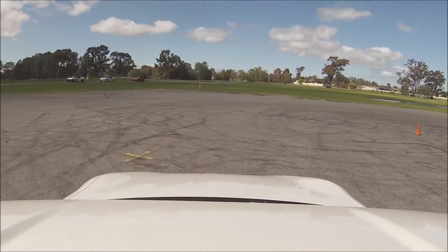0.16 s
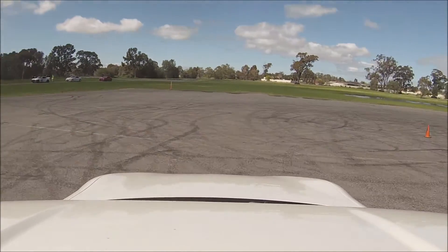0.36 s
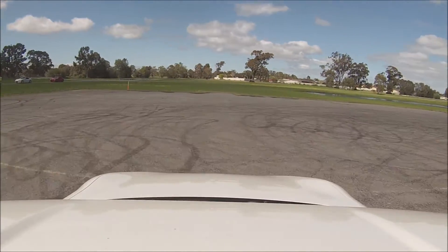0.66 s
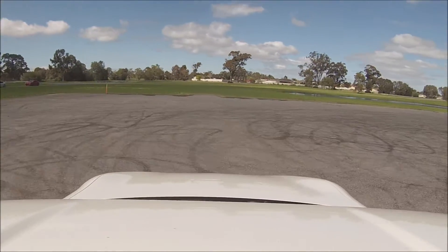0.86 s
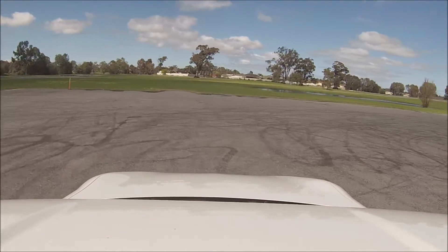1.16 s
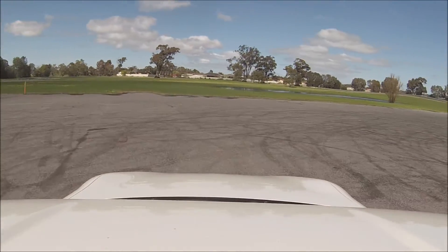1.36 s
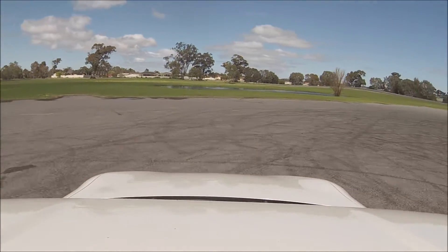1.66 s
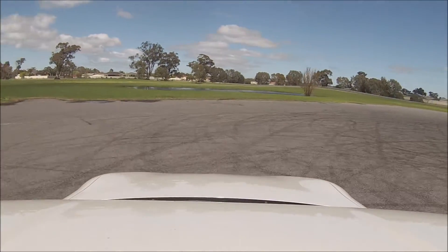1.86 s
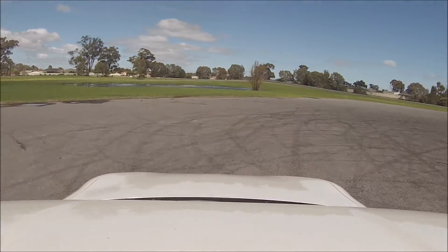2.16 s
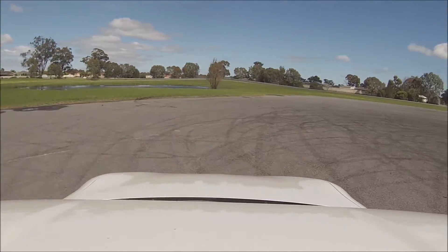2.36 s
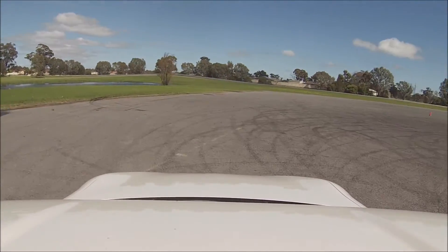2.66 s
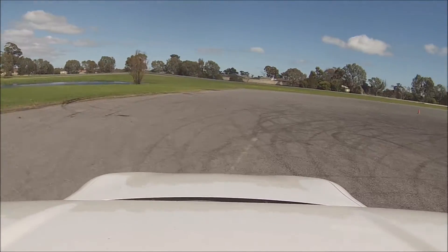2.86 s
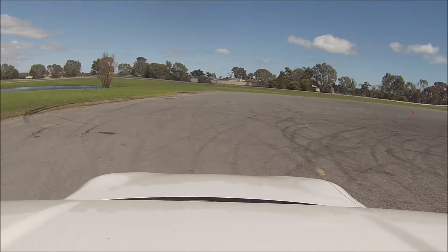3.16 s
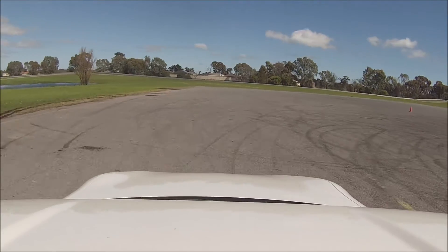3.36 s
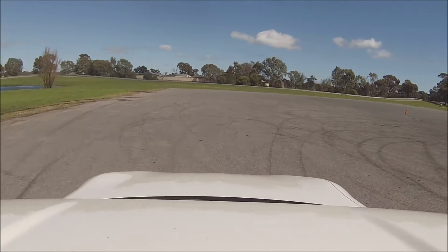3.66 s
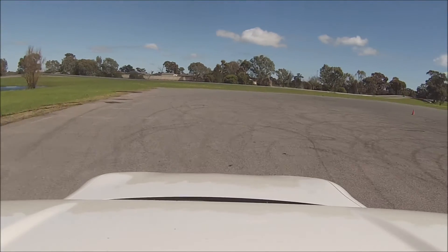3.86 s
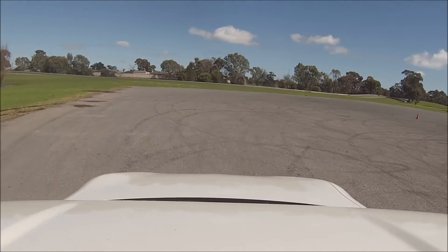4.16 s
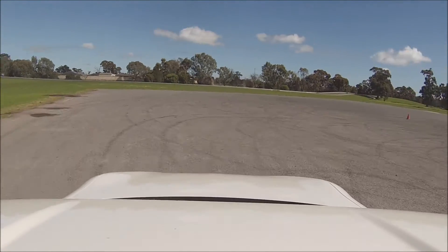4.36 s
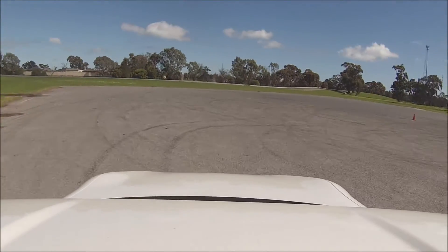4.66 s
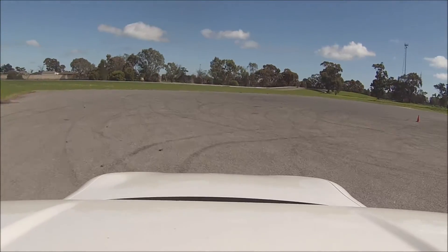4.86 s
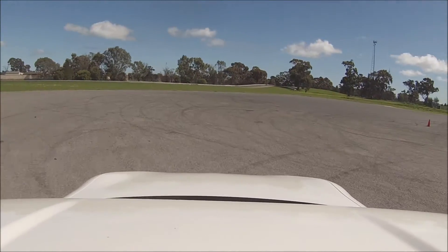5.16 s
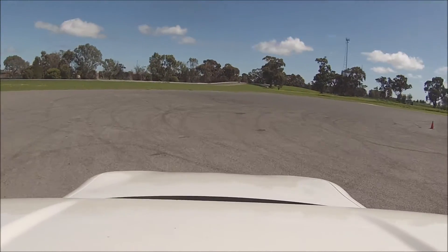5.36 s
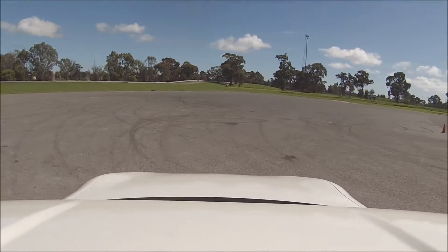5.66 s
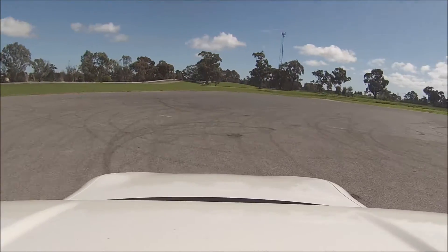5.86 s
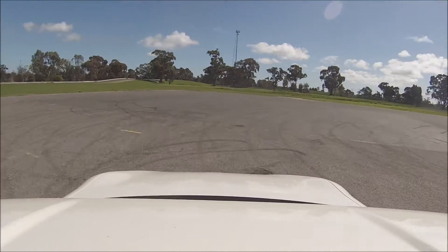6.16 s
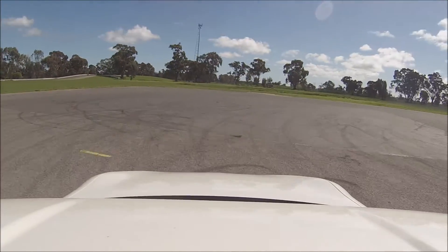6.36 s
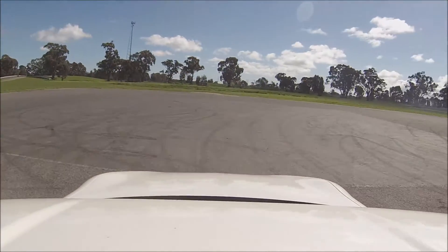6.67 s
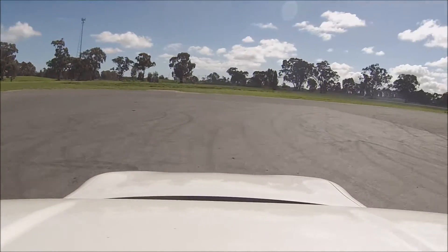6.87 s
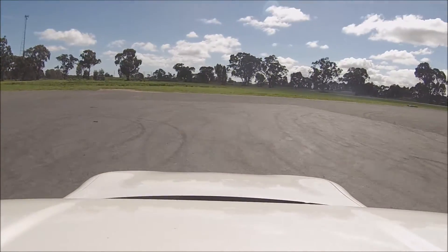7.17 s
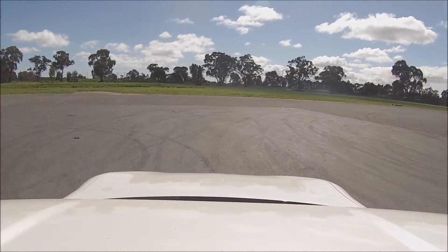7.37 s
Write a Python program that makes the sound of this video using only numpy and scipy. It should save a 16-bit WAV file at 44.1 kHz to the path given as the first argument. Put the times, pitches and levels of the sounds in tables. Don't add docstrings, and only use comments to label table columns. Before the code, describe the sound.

Continuous mono sound from an encased microphone on the roof of a car sliding around open tarmac, already under way at 0 s. A low, clean engine hum moves within a narrow range, sagging near 1 s, swelling around 1.7 s, sinking by 2.9 s, then surging near 3.5, 4.2, 5.2 and 6.1 s, the last climb highest and barkiest. Beneath it, rough road shakes the body in a fluttering low boom. Coarse, ringing tyre scrub with airy fizz dominates until about 1.8 s, then eases but persists, fading after 6 s. Hollow tyre howl thickens at 2.1-3.8, 4.4-5 and from 6.6 s. Grit ticks scatter, clustering at 2.4-3.1 s, with a sharp knock at 2.5 s and a softer one at 7.1 s. Faint valve breaths come between 2.1 and 5.8 s. A loose mount buzzes in bursts from 6.5 to 7.4 s; the sound ends still moving.

```python
import sys
import numpy as np
from scipy import signal
from scipy.fft import rfft, irfft, next_fast_len
from scipy.io import wavfile
from scipy.ndimage import uniform_filter1d, minimum_filter1d, map_coordinates

SR = 44100
rng = np.random.default_rng(int(sys.argv[2]) if len(sys.argv) > 2 else 0)


def generate_wav(signal):
    frames = np.transpose(np.atleast_2d(signal))
    scaled = np.clip(frames, -1, 1) * 32767
    pcm = np.round(scaled).astype(np.int16)
    wavfile.write(sys.argv[1], SR, pcm)


def makeup_ratio(level_db):
    decades = np.asarray(level_db, float) / 20
    return 10 ** decades


N = 330750

# [t/s, f/Hz]
FIRING_RATE = [(0, 132.6), (.14, 138.3), (1.02, 121.4), (1.3, 130.5), (1.679, 149.4), (2.922, 112),
               (3.451, 148.3), (3.758, 134), (4.199, 163.4), (4.444, 137.5), (4.841, 120.3), (5.2, 153.3),
               (5.56, 123.2), (5.8, 135.4), (6.115, 169.9), (6.466, 127.8), (7.151, 117.4), (7.5, 136)]
FLYWHEEL_S, FULL_LOAD_HZ_PER_S, LOAD_LAG_S = 0.062, 80, 0.02
# [firing f/Hz, level/dB]
BODY_BOOM = [(115, -40), (126, -34), (134, -25), (142, -19), (150, -11), (157, -10), (161, -18.5),
             (167, -33.5)]
# [firing f/Hz, change/dB]
LOAD_SWING = [(120, 8), (138, 3), (146, 2.5), (152, -2), (170, 12)]
# [start t/s, end t/s, firing tone level/dB, upper
# orders level/dB]
STABS = [(-.1, .5, 2, 0.5), (1.148, 1.62, 1, -1.5), (1.61, 2.35, -2.5, -2), (3.0, 3.56, 1, -1),
         (3.56, 3.9, 4, 3), (3.901, 4.449, 0.5, -1), (4.82, 5.45, 0.5, 1.5), (5.605, 6.003, 1, 1.5),
         (6.001, 6.129, -1.5, 2.5), (6.128, 6.224, 14, 7), (6.224, 6.31, 0, 4), (6.3, 6.36, 7, -3.5),
         (6.372, 6.616, 5.5, -5), (7.202, 7.6, 1.5, -1.5)]
STAB_EDGE_S = 0.05
SECOND_DB, SECOND_SWING_DB, THIRD_DB, THIRD_SWING_DB = -45, 7.5, -58.5, 12
# [f/Hz, width/Hz, level/dB]
SECOND_PATH = [(259.4, 15, -2.5), (284.5, 14, 1.5), (340, 40, -9.5)]
# [multiple of firing rate, level/dB]
BARK = [(3.5, -8.5), (4, 0), (4.5, -3.5), (5, -5.5), (5.5, -7.5), (6, -3), (7, -7.5)]
# [f/Hz, width/Hz, level/dB]
EXHAUST_PATHS = [(245, 14, 0), (382, 48, 1.5), (510, 26, -7.5), (575, 38, -1), (658, 23, 2.5),
                 (766, 100, -1), (855, 98, -6.5)]

BOOM_DB, RUSH_DB, RUSH_SWING_DB, HUM_DB = -31, -41.5, 1, -42.5
# [f/Hz, width/Hz, level/dB]
BODY = [(15, 15, -7), (58, 14, -17), (92.4, 8.5, 2.4), (126, 18, -4.5), (154.5, 7.1, 3.5), (181, 17.6, -15),
        (252, 12, -21), (273, 6.65, -15.5), (341, 43, -29)]
# [f/Hz, level per Hz/dB]
EXHAUST_RUSH = [(170, -18), (290, 1), (302, -9), (371, -6.5), (426, -14.5), (495, -5.5), (582, -10.5),
                (681, -4.5), (1020, -10.5), (1100, -8), (1430, -24.5), (2420, -120)]
# [f/Hz, width/Hz, level/dB]
CASE_LOW = [(1106, 21, 1.5), (1172, 110, -0.5), (1266, 21, 1), (1535, 160, -7), (975, 440, -7),
            (776, 6.7, -3.5)]
# [start t/s, end t/s, hum level/dB, boom level/dB], over steady rolling
HOWLS = [(1.598, 2.1, -1.5, -1.5), (2.093, 2.45, 2.5, -0.5), (2.448, 3.05, 4, -1.5), (3.053, 3.455, 3, 1),
         (3.55, 3.8, 4, -0.5), (4.4, 5.05, 3, -1), (5.7, 5.904, 2.5, -1.5), (6.62, 6.847, 3.5, -1),
         (6.839, 7.194, 3.5, 4), (7.204, 7.6, 3.5, 1.5)]
HOWL_EDGE_S = 0.084
# [f/Hz, width/Hz, level/dB]
WHISTLE = [(1108, 8, 0), (1255, 12, -6)]
WHISTLE_DB, WHISTLE_GROWS = -59.5, 2.9
# [f/Hz, level per Hz/dB]
TREAD = [(1200, -21), (1450, 0.5), (1600, 2.5), (1740, 9), (1900, 1.5), (2100, 2.5), (3000, 0),
         (3900, -13.5), (4100, -17.5), (4500, -51)]

# [t/s, level/dB]
SPIN = [(0, -8), (.5, 1), (.9, 0), (1.3, 4), (1.7, -1), (2.2, 3.5), (2.6, 0), (3.1, -3), (3.7, -1),
        (4.0, -3.5), (4.3, 1), (4.7, 0.5), (5.3, -2.5), (5.8, -1), (6.25, -4.5), (6.45, -9), (6.85, -7.5),
        (7.5, -15.5)]
# [t/s, level/dB]
SLIDE = [(0, -32.5), (.24, -29.5), (.7, -26), (.95, -26), (1.33, -24.5), (1.58, -26), (1.9, -33),
         (2.1, -40), (2.5, -55.5)]
SCRUB_DB, FIZZ_DB, HISS_DB, TREAD_DB = -39.5, -51, -65.5, -41.5
FIZZ_GROWS, HISS_GROWS, TREAD_GROWS = 0.88, 1.3, 0.7
TREAD_UNDER_SLIDE_DB = -11.5
# [f/Hz, width/Hz, level/dB]
CASE_RING = [(1683, 87, -15), (3414, 227, 0.5), (3420, 340, -3), (3838, 131, -4.5), (4800, 250, -23),
             (5604, 200, -17.5), (6400, 240, -20), (7630, 470, -28), (8250, 290, -36), (10360, 300, -38)]
# [f/Hz, level per Hz/dB]
FIZZ = [(3600, -25.5), (4100, -0.5), (4800, 1), (5200, -4.5), (5700, -4.5), (5950, -10.5), (6300, -6),
        (7200, -6), (7900, -13), (8600, -10.5), (9500, -17.5), (11000, -25.5), (13000, -33.5)]
# [f/Hz, level per Hz/dB]
HISS = [(8000, -32.5), (9500, 0), (10500, -1), (11700, -0.5), (12500, -6), (14000, -12), (14900, -19),
        (15100, -43), (16000, -80)]

# [t/s, peak level/dB]
GRIT = [(0.1511, -45), (0.3994, -54), (0.8394, -59), (0.9194, -56), (2.3564, -41), (2.4468, -44.5),
        (2.5735, -41), (2.7092, -43), (2.9068, -40), (2.9876, -42), (3.017, -42.5), (3.0714, -51),
        (4.6763, -54.5), (5.1512, -53), (6.9202, -53.5), (6.9314, -51), (7.0753, -49.5)]
# [t/s, peak level/dB]
KNOCKS = [
    (2.4808, -21),
    (7.0848, -26.5),
]
# [t/s, length/s, level/dB]
PUFFS = [
    (2.12, .08, -62.5),
    (2.28, .09, -62.5),
    (4.27, .05, -63),
    (4.43, .035, -68),
    (4.68, .06, -69),
    (4.95, .04, -69),
    (5.16, .025, -67),
    (5.8, .05, -70),
]
# [start t/s, end t/s, level/dB]
RATTLE = [
    (6.52, 6.75, -60.5),
    (6.82, 6.9, -59.5),
    (6.9, 7.145, -56.5),
    (7.232, 7.35, -58),
    (7.37, 7.41, -65),
]
RATTLE_EDGE_S = 0.015

AGC_FROM_DB, AGC_SHARE, AGC_S, AGC_LAG_S = -18.5, 0.18, 0.16, 0.094
# [f/Hz, level per Hz/dB]
MIC_NOISE = [(3000, -30), (7000, 0), (12000, -7), (14800, -14), (15100, -40), (16000, -80)]
MIC_NOISE_DB = -74


def unit(x):
    return x / np.sqrt(np.mean(x ** 2) + 1e-20)


def curves(rows):
    s, *cols = np.transpose(rows)
    return [np.interp(np.arange(N) / SR, s, c) for c in cols]


def wobble(rate):
    knots = rng.standard_normal(int(N * rate / SR) + 4)
    return map_coordinates(knots, [np.arange(N) * rate / SR])


def gate(start, end, edge):
    t = np.arange(N) / SR
    rise = np.clip((t - start) / edge + 0.5, 0, 1)
    fall = np.clip((end - t) / edge + 0.5, 0, 1)
    return rise * fall


def filtered(x, response):
    m = next_fast_len(N + 8192)
    return irfft(rfft(x, m) * response(np.fft.rfftfreq(m, 1 / SR)), m)[:N]


def spectrum(points):
    f, db = np.transpose(points)
    return lambda hz: makeup_ratio(np.interp(np.log(hz + 1), np.log(f + 1), db))


def resonances(modes, order=2):
    def response(hz):
        peaks = [makeup_ratio(db) / (1 + np.abs((hz - c) / w) ** order) for c, w, db in modes]
        return np.sqrt(sum(peak ** 2 for peak in peaks))
    return response


def rush(response, grain_db, swell_db):
    rough = makeup_ratio(grain_db * wobble(260) + swell_db * wobble(12))
    return unit(filtered(rough * rng.standard_normal(N), response))


def strikes(events, gain_db):
    hits = np.zeros(N)
    for s, db in events:
        hits[round(s * SR)] = makeup_ratio(db + gain_db)
    return hits


def clicks(hits, bands, t60):
    fade = makeup_ratio(-60 * np.arange(SR // 20) / SR / t60)
    bursts = signal.fftconvolve(hits, fade)[:N] * rng.standard_normal(N)
    return filtered(bursts, resonances(bands, order=4))


def revs():
    s, hz = np.transpose(FIRING_RATE)
    climb = np.diff(hz) / np.diff(s)
    before, after = np.r_[climb[0], climb], np.r_[climb, climb[-1]]
    slope = np.where(before * after > 0, 2 * before * after / (before + after + 1e-9), 0)
    t = np.arange(N) / SR
    k = np.clip(np.searchsorted(s, t) - 1, 0, len(s) - 2)
    length = np.diff(s)[k]
    u = (t - s[k]) / length
    eased = hz[k] + np.diff(hz)[k] * u * u * (3 - 2 * u)
    eased = eased + length * u * (1 - u) * ((1 - u) * slope[k] - u * slope[k + 1])
    firing_hz = uniform_filter1d(eased, int(SR * FLYWHEEL_S), mode="nearest")
    effort = np.clip(np.gradient(firing_hz) * SR / FULL_LOAD_HZ_PER_S, -1, 1)
    return firing_hz, np.interp(t - LOAD_LAG_S, t, effort)


def engine():
    firing_hz, effort = revs()
    turn = 2 * np.pi * np.cumsum(firing_hz) / SR
    tone_db = sum(db * gate(a, b, STAB_EDGE_S) for a, b, db, _ in STABS)
    open_db = sum(db * gate(a, b, STAB_EDGE_S) for a, b, _, db in STABS)

    swing_db = tone_db + effort * np.interp(firing_hz, *np.transpose(LOAD_SWING))
    tone = spectrum(BODY_BOOM)(firing_hz) * makeup_ratio(swing_db + 0.1 * wobble(28)) * np.sin(turn)

    second = makeup_ratio(SECOND_DB + open_db / 2 + SECOND_SWING_DB * effort)
    second = second * resonances(SECOND_PATH)(2 * firing_hz)
    second = second * makeup_ratio(1.5 * wobble(15)) * np.sin(2 * turn + 0.3 * wobble(30))

    uneven = makeup_ratio(-40 + 3.4 * wobble(5.1)) * np.sin(1.4 * turn)
    third = makeup_ratio(2.5 * wobble(15)) * np.sin(3 * turn + 0.3 * wobble(30))
    bark = np.zeros(N)
    for multiple, db in BARK:
        phase = multiple * turn + 0.4 * wobble(30) + rng.uniform(0, 2 * np.pi)
        bark += makeup_ratio(db + 3.5 * wobble(13)) * np.sin(phase)
    load = np.clip(0.2 + np.gradient(firing_hz) * SR / 60, 0.05, 1)
    third_db = THIRD_DB + open_db + THIRD_SWING_DB * effort
    upper = uneven + makeup_ratio(third_db + 1.5) * (third + load * bark)
    return np.sqrt(2) * (tone + second + filtered(upper, resonances(EXHAUST_PATHS)))


def road():
    boom_db = BOOM_DB + sum(db * gate(a, b, HOWL_EDGE_S) for a, b, _, db in HOWLS)
    boom = makeup_ratio(boom_db + 6) * rush(resonances(BODY), grain_db=2.0, swell_db=1.16)

    _, effort = revs()
    open_db = sum(db * gate(a, b, STAB_EDGE_S) for a, b, _, db in STABS)
    rush_db = RUSH_DB + RUSH_SWING_DB * effort + open_db / 2
    exhaust = makeup_ratio(rush_db + 0.5) * rush(spectrum(EXHAUST_RUSH), grain_db=1.0, swell_db=1.0)

    howl_db = sum(db * gate(a, b, HOWL_EDGE_S) for a, b, db, _ in HOWLS)
    hum = makeup_ratio(HUM_DB + howl_db + 1.92) * rush(resonances(CASE_LOW), grain_db=0.0, swell_db=1.0)
    whistle = makeup_ratio(WHISTLE_DB + WHISTLE_GROWS * howl_db)
    whistle = whistle * rush(resonances(WHISTLE), grain_db=-2.2, swell_db=1.2)

    spin_db, = curves(SPIN)
    slide_db, = curves(SLIDE)
    rolling = np.hypot(makeup_ratio(TREAD_DB + TREAD_GROWS * spin_db), makeup_ratio(slide_db + TREAD_UNDER_SLIDE_DB))
    tread = makeup_ratio(4.0) * rolling * rush(spectrum(TREAD), grain_db=0.63, swell_db=0.87)
    return boom + exhaust + hum + whistle + tread


def slide():
    spin_db, = curves(SPIN)
    slide_db, = curves(SLIDE)
    surge = wobble(11)
    grain = makeup_ratio(1.4 * wobble(200) + 0.5 * surge)

    rubbing = np.hypot(makeup_ratio(SCRUB_DB + spin_db), makeup_ratio(slide_db))
    ringing = rush(resonances(CASE_RING, order=3), grain_db=1.0, swell_db=1.0)
    scrub = rubbing * makeup_ratio(0.33 + 0.5 * surge) * ringing

    fizz = unit(grain * rush(spectrum(FIZZ), grain_db=0.2, swell_db=1.1))
    fizz = makeup_ratio(FIZZ_DB + FIZZ_GROWS * spin_db + 1.0) * fizz
    hiss = unit(grain * rush(spectrum(HISS), grain_db=1.5, swell_db=1.2))
    hiss = makeup_ratio(HISS_DB + HISS_GROWS * spin_db - 1.0) * hiss
    return scrub + fizz + hiss


def grit():
    tick_bands = [(8500, 1500, -6), (12500, 2600, 1)]
    flicks = filtered(strikes(GRIT, gain_db=13.5), resonances(tick_bands, order=4))
    knocks = clicks(strikes(KNOCKS, gain_db=5), [(3750, 250, 0)], t60=0.025)
    return flicks + knocks


def vent():
    t = np.arange(N) / SR
    flow = sum(makeup_ratio(db) * np.exp(-((t - s) / length) ** 2) for s, length, db in PUFFS)
    valve = resonances([(11600, 900, -1.0), (13000, 1200, -9.5)])
    return flow * rush(valve, grain_db=3.0, swell_db=-3.0)


def rattle():
    swing = np.cumsum(180 * (1 + 0.2 * wobble(90))) / SR
    at = np.flatnonzero(np.diff(np.floor(swing)))
    hits = np.zeros(N)
    hits[at] = makeup_ratio(3 * rng.standard_normal(len(at)))
    taps = clicks(hits, [(6900, 650, 0), (8500, 850, -8), (10800, 1500, -21)], t60=0.007)
    loose = sum(makeup_ratio(db + 1) * gate(a, b, RATTLE_EDGE_S) for a, b, db in RATTLE)
    return loose * unit(taps)


def scene():
    return (engine() + road() + slide() + grit() + vent() + rattle())[None]


def top_cut(x):
    return signal.sosfilt(signal.butter(12, 15150, fs=SR, output="sos"), x)


def record(dry):
    power = uniform_filter1d(dry ** 2, int(SR * AGC_S))
    level_db = 10 * np.log10(np.abs(power) + 1e-9)
    late_db = np.interp(np.arange(N) - AGC_LAG_S * SR, np.arange(N), level_db[0])
    held = dry * makeup_ratio(-AGC_SHARE * np.maximum(late_db - AGC_FROM_DB, 0))
    needed = np.minimum(1, 0.47 / (np.abs(held) + 1e-9))
    gain = uniform_filter1d(minimum_filter1d(needed, SR // 40), SR // 80)
    floor = makeup_ratio(MIC_NOISE_DB) * rush(spectrum(MIC_NOISE), grain_db=1.0, swell_db=1.0)
    return top_cut(held * gain + floor)


dry = scene()
out = record(dry)
generate_wav(out)
```